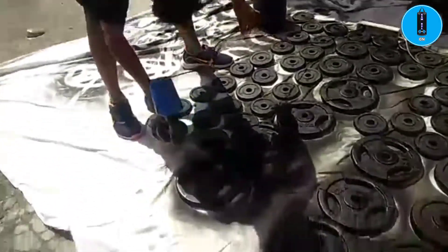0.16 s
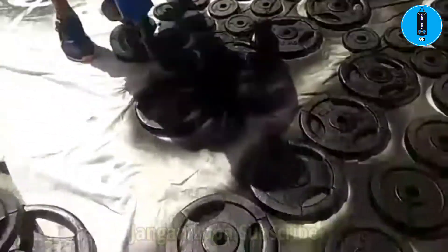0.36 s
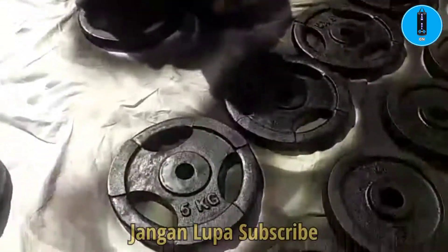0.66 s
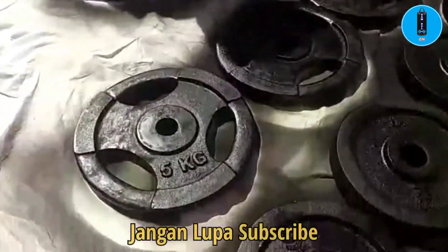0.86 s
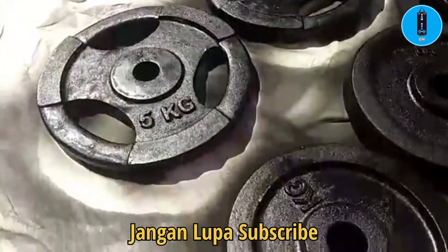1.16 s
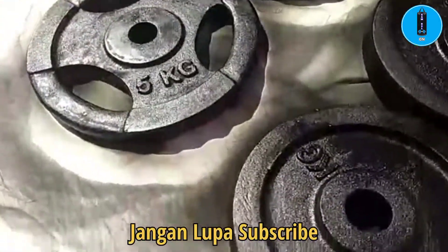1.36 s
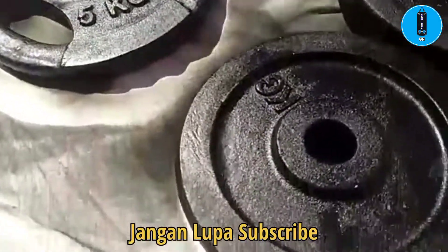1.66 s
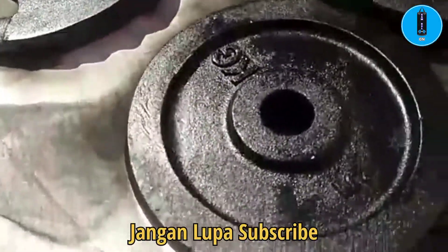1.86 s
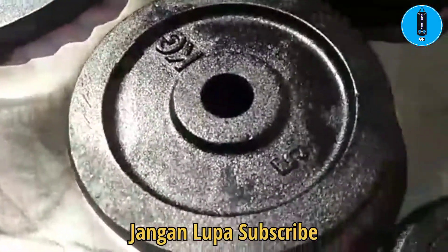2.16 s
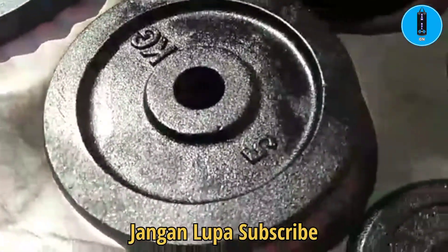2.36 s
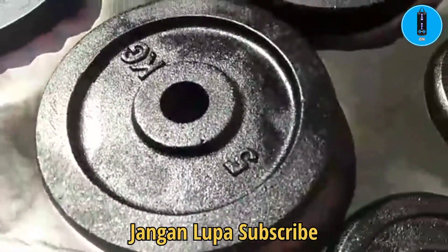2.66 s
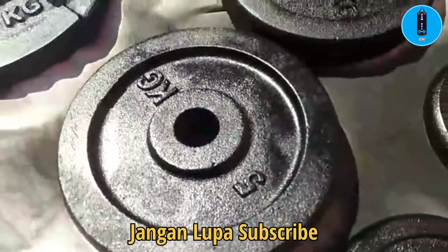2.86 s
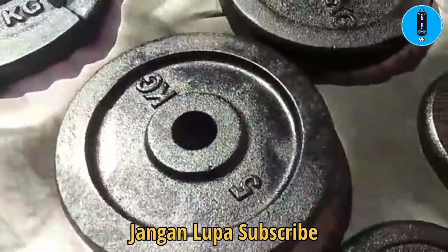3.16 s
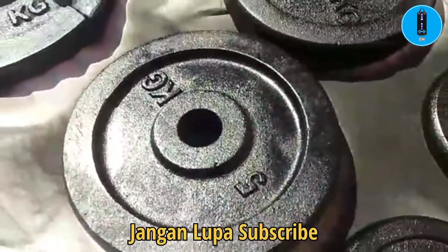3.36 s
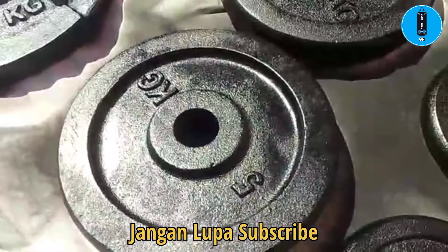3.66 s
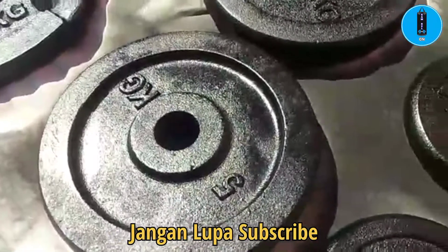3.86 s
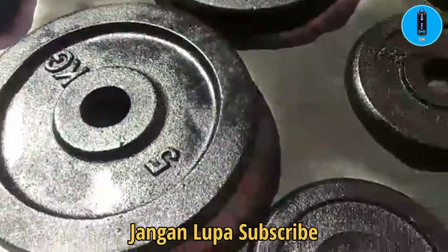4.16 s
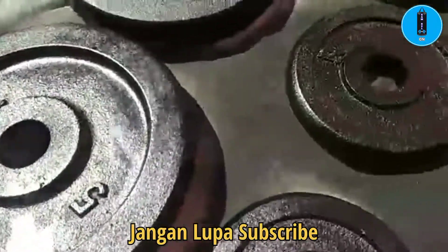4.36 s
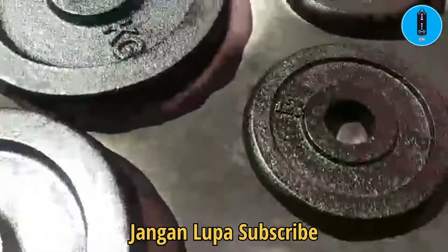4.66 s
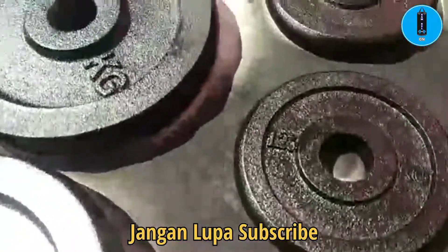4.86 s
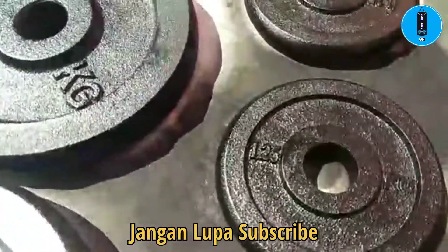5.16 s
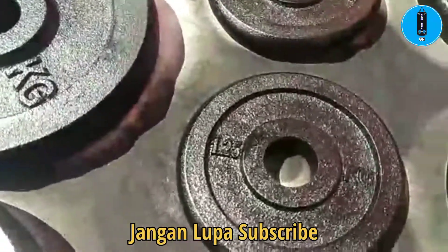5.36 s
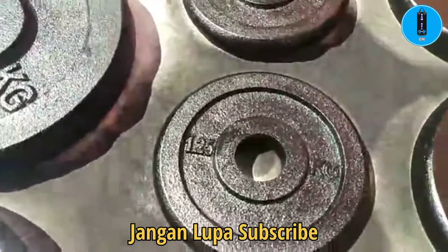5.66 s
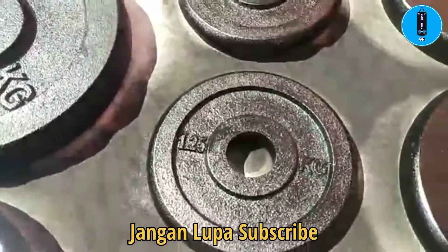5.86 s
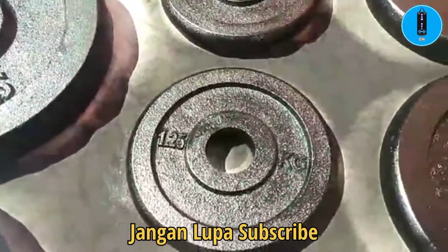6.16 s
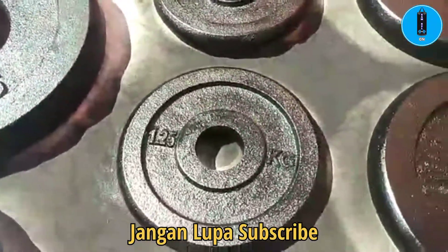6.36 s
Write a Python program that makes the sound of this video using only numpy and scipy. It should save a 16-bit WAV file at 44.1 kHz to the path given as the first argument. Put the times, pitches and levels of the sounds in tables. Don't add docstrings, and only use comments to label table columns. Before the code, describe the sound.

Continuous rushing, ringing motor noise with sharp spray hiss and piercing whine, wide in stereo at first and shifting as the handset moves. Then skin bumps and seals the left microphone, leaving muffled thuds there and the quieter sprayer on the right. A faint far bird whistles briefly; later the hand shifts with a dry scrape and dull knocks. Rough, slightly clipped, grainy handset sound.

```python
import sys
import numpy as np
from scipy import signal
from scipy.fft import rfft, irfft, next_fast_len
from scipy.io import wavfile
from scipy.ndimage import uniform_filter1d

SR = 44100
rng = np.random.default_rng(int(sys.argv[2]) if len(sys.argv) > 2 else 0)


def materialize(psi):
    bounded = np.clip(np.atleast_2d(psi).T, -1, 1)
    quanta = np.round(bounded * 32767).astype(np.int16)
    wavfile.write(sys.argv[1], SR, quanta)


def invert_db(level):
    return 10 ** (np.asarray(level, dtype=float) / 20)


N = 286631


def rms_one(x):
    return x / np.sqrt(np.mean(x ** 2) + 1e-20)


def in_time(rows):
    s, *columns = np.transpose(rows)
    return [np.interp(np.arange(N) / SR, s, c) for c in columns]


def at_hz(points, hz):
    points_hz, points_db = np.array(points)[:, 0], np.array(points)[:, 1]
    return np.interp(np.log(hz), np.log(points_hz), points_db)


def drift(rate):
    r = np.exp(-80 * np.pi * rate / SR)
    white = rng.standard_normal(N // 40 + 2002)
    slow = signal.lfilter([1], [1, -2 * r, r * r], white)[2000:]
    return np.interp(np.arange(N) / 40, np.arange(len(slow)), rms_one(slow))


def passed(x, hz, kind, order=2):
    return signal.sosfilt(signal.butter(order, hz, kind, fs=SR, output="sos"), x)


def ramp(start_s, length_s):
    return np.clip((np.arange(N) / SR - start_s) / length_s, 0, 1)


def bumps(rows, size_of):
    t = np.arange(0, N, 100) / SR
    total = sum(size_of(size) * np.exp(-((t - s) / length) ** 2) for s, length, size in rows)
    return np.interp(np.arange(N) / SR, t, total)


def beam_db(rows, floor_db):
    return 20 * np.log10(invert_db(floor_db) + bumps(rows, invert_db))


# time in seconds, nearness in dB, nozzle aim in dB, casing turn in dB.
GUN = [(0, -3.5, -7.5, 6), (.3, -3.5, -6, 9.5), (.5, -1, -3, 1.5), (.9, .5, -1, 3), (1.5, 0, -1, -0.5),
       (2.0, 1, -2, -0.5), (2.2, 1.5, -1.5, -2), (2.6, -0.5, 0, 2.5), (2.9, 0, -0.5, 3.5),
       (3.5, .5, -0.5, 2), (4.0, -1, -0.5, 3.5), (4.35, 0.5, -0.5, 1.5), (4.5, -0.5, 3, -2),
       (4.65, -1, -0.5, 1), (5.35, -.5, 0, -3), (5.75, -1, -4.5, 0), (6.0, -.5, -2, -4.5),
       (6.5, -1, -1.5, -4.5)]


def gun_position():
    return in_time(GUN)


# time in seconds, share closed from 0 to 1.
SEAL = [
    (2.04, 0.08),
    (2.2, 0.54),
    (2.48, 0.75),
    (2.62, 0.86),
    (3.3, 0.97),
]
OPEN_LAG, SEALED_LAG = 6.8, 18.0


def later(x):
    lag = OPEN_LAG + (SEALED_LAG - OPEN_LAG) * in_time(SEAL)[0]
    return np.interp(np.arange(N) - lag, np.arange(N), x)


COVER_HZ = [670, 1600, 2750, 3400, 4700, 5600, 9000, 13000]
OPEN_DB = [0.5, 3.5, -2, 0, -6, -1.5, -0.5, 3.5]
SEALED_DB = [-30.5, -38.5, -45, -33.5, -35, -29, -28, -36]
FACING_SHARE = [0, 0.072, .14, .17, .25, .3, .6, 0.98]
# time in seconds, gain in dB.
FACING = [(0, 5.5), (.15, 6.5), (.28, 0.5), (.52, 8), (.72, 0.5), (1.0, 2), (1.3, 4.5), (1.88, 6.5),
          (2.02, 3.5)]
# time in seconds, gain in dB.
TREBLE_LEAK = [(2.1, -0.5), (2.3, 6), (2.8, 3.5), (3.4, -5), (4.6, -8), (4.69, 0), (5.1, 0), (5.3, -4),
               (5.6, -2), (5.75, 2), (6.5, -1)]
LEAK_S, LEAK_DB = 4.68, 9


def left_db(hz):
    t = np.arange(0, N, 200) / SR
    open_db, sealed_db, share = (np.interp(np.log(hz), np.log(COVER_HZ), values)
                                 for values in (OPEN_DB, SEALED_DB, FACING_SHARE))
    seal = np.interp(t, *np.transpose(SEAL))
    facing_db = share * np.interp(t, *np.transpose(FACING))
    leak_db = LEAK_DB * (t > LEAK_S) * np.clip(np.log2(hz / 4000) / 1.1, 0, 1)
    gap_db = (t > 2.05) * np.interp(t, *np.transpose(TREBLE_LEAK)) * np.clip(2 * np.log2(hz / 8500), 0, 1)
    shade_db = -30 * max(np.log2(hz / 13500), 0)
    level_db = (1 - seal) * (open_db + facing_db) + seal * sealed_db + leak_db + gap_db
    return np.interp(np.arange(N) / SR, t, level_db) + shade_db


# pitch in Hz, likeness from 0 to 1.
LIKENESS = [(250, 0.55), (700, 0.92), (1700, 0.57), (2500, 0.23), (3500, 0.61), (5200, 0.28), (7500, 0.89),
            (11000, 0.4), (15000, 0.84)]
# pitch in Hz, change in dB.
NEAR_DB = [(300, -5.5), (500, -1), (1000, 0), (2000, 1), (3200, 3), (4200, 1), (6000, 0.5), (8000, 2),
           (10500, -1.5), (13000, 2.5), (15500, 1)]
# centre in seconds, length in seconds, pitch in
# Hz, change in dB.
SWELL_PATCHES = [(0.14, .15, 5600, -6), (.1, 0.091, 640, 10), (0.48, 0.098, 4200, 6), (0.94, 0.24, 1960, 4),
                 (0.83, 0.27, 1060, 4.5), (1.62, 0.13, 5000, 6.5), (1.54, 0.19, 1600, -5.5),
                 (1.74, .15, 14000, -1), (2.02, 0.21, 810, -9), (2.14, 0.1004, 3400, -5.5),
                 (3.2, 0.33, 1900, -2.5), (5.1, 0.67, 1600, 3), (5.2, 0.15, 3500, 3), (5.6, 0.34, 6300, -4),
                 (6.23, 0.28, 9600, 6), (5.15, .1, 9400, 2), (5.6, .9, 2300, -3.5), (6.6, 0.34, 3600, 4),
                 (4.68, 0.036, 4600, -7), (1.1, .15, 14000, -1), (1.62, 0.16, 14000, 1), (1.58, .12, 1200, 3),
                 (.35, 0.16, 9000, 7)]
PATCH_OCTAVES = 0.24


def turbulence(spectrum, ref_hz, per_octave, shared_db, own_db, fast_db, fast_hz):
    size = next_fast_len(N)
    hz = np.maximum(np.arange(size // 2 + 1) * SR / size, 1)
    low_hz, high_hz = spectrum[0][0], spectrum[-1][0]
    right, other = rng.standard_normal((2, N))
    colour = invert_db(at_hz(spectrum, hz)) * (hz > low_hz) * (hz < high_hz)
    in_ref = (hz > ref_hz[0]) & (hz < ref_hz[1])
    colour = colour / np.sqrt(np.sum(colour[in_ref] ** 2) / len(hz))
    near, late, apart = (colour * rfft(v, size) for v in (right, later(right), other))
    out = np.zeros((2, N))
    together = shared_db * drift(10.3)
    both_open = np.clip(1.5 + left_db(670) / 15, 0, 1)
    casing_db = gun_position()[2]
    steps = np.arange(per_octave * np.log2(high_hz / low_hz) + 1)
    for centre in low_hz * 2 ** (steps / per_octave):
        band = np.cos(np.pi / 2 * np.clip(per_octave * np.log2(hz / centre), -1, 1)) ** 2
        alike = np.clip(at_hz(LIKENESS, centre), 0, 1)
        common = late if centre < 6500 else near
        casing_lift_db = .6 * casing_db * np.exp(-(np.log2(centre / 2800) / 0.28) ** 2)
        shape_db = both_open * at_hz(NEAR_DB, centre) + casing_lift_db
        patch_rows = [(s, length, db * np.exp(-(np.log2(centre / at) / PATCH_OCTAVES) ** 2))
                     for s, length, at, db in SWELL_PATCHES]
        flicker_db = together + own_db * drift(2.48) + fast_db * drift(fast_hz)
        flicker = invert_db(shape_db + bumps(patch_rows, float) + flicker_db)
        left_mix = alike * common + np.sqrt(1 - alike ** 2) * apart
        out[0] += flicker * invert_db(left_db(centre)) * irfft(band * left_mix, size)[:N]
        out[1] += flicker * irfft(band * near, size)[:N]
    return out


# pitch in Hz, level in dB per Hz.
ROAR_LOW = [
    (230, -13),
    (335, -21),
    (430, -10.5),
    (600, -13),
    (740, -10),
]
# pitch in Hz, level in dB per Hz.
ROAR = [(440, -42), (750, -8), (815, -20.5), (920, -10.5), (1400, -13), (1850, -10), (2400, -10),
        (2740, -5.5), (3100, -7), (3700, -8), (4370, -6), (4730, -9), (4970, -10), (6180, -12),
        (8000, -22.5), (10400, -14.5), (17600, -120)]


def casing_roar(roar_db):
    spectrum = ROAR_LOW + list(ROAR[1:-1])
    return invert_db(roar_db - 1.5) * turbulence(spectrum, (1000, 4400), per_octave=3, shared_db=0.22,
                                           own_db=1.27, fast_db=1.9, fast_hz=40.5)


def casing_mouth(roar_db):
    centre_hz, width_hz = 2790, 230
    edges = [centre_hz - width_hz / 2, centre_hz + width_hz / 2]
    ring = rms_one(passed(rng.standard_normal((2, N)), edges, "band", order=1))
    turn_db = 1.7 * np.clip(gun_position()[2], -8, 4)
    level = invert_db(roar_db - 10.5 + turn_db + 1.3 * drift(15))
    return level * ring * np.array([invert_db(left_db(centre_hz)), np.ones(N)])


# pitch in Hz, level in dB per Hz.
JET = [
    (6500, -44),
    (7800, -36),
    (8700, -25),
    (9500, -19),
    (10800, -13),
    (12300, -6),
    (13600, -2.5),
    (14900, 0),
    (15900, 0),
]


def nozzle_jet(jet_db):
    return invert_db(jet_db) * turbulence(JET, (10500, 15600), per_octave=12, shared_db=0.1,
                                    own_db=.6, fast_db=1.8, fast_hz=22)


def tone(cycles, level_db, hz):
    wave = np.sqrt(2) * invert_db(level_db) * np.sin(2 * np.pi * cycles)
    return np.array([invert_db(left_db(hz)) * later(wave), wave])


# time in seconds, pitch in Hz.
SHAFT = [
    (0.0, 682),
    (0.07, 667),
    (6.46, 666),
    (6.5, 672),
]
# multiple of the shaft speed, level in dB against the roar.
ORDERS_DB = [
    (2, -27.5),
    (3, -30.5),
    (4, -23),
    (6, -23),
    (21, -14.5),
]
# centre in seconds, length in seconds, change in dB.
FADES = [(0, 0.12, -2), (.55, 0.17, -6), (.8, .13, -7), (.9, 0.033, -5), (.96, .02, 2), (1.02, 0.041, -7),
         (1.09, 0.029, 3.5), (1.17, 0.033, -1), (1.28, 0.11, -3.5), (1.44, .04, -1.5), (1.53, 0.037, -11),
         (1.76, .05, -3), (2.1, 0.05, 5), (2.35, 0.43, 2), (2.61, 0.036, -12), (2.75, 0.091, -3.5),
         (3.23, 0.046, -10), (3.55, 0.18, -2.5), (4.75, 0.21, 3), (5.5, 0.46, 2), (6.1, 0.13, 3)]
# time in seconds, lean in dB.
SWAY = [(.55, 2), (.7, 4), (.85, 4), (1.0, 1.5), (1.2, 5), (1.4, 5), (1.55, 3), (1.7, 2.5), (1.9, 2.5),
        (2.05, 2)]
# centre in seconds, length in seconds, level in dB.
BEAMS = [(0, 0.035, -31), (.2, 0.065, -43.5), (.37, 0.078, -33.5), (.62, 0.063, -36.5), (.88, 0.068, -27),
         (1.15, 0.12, -27), (1.34, 0.091, -26.5), (1.52, 0.11, -28.5), (2.0, 0.11, -31), (2.3, 0.13, -41.5),
         (2.6, 0.12, -45), (3.0, 0.18, -39.5), (3.42, 0.046, -43), (3.68, 0.16, -33.5), (3.87, 0.073, -50),
         (4.13, 0.051, -41), (4.5, 0.084, -40), (4.62, 0.036, -51), (4.9, 0.069, -50), (5.27, 0.1, -43.5),
         (5.54, 0.054, -47), (6.03, 0.04, -44), (6.25, 0.14, -45), (6.49, 0.034, -37)]
# centre in seconds, length in seconds, level in dB.
HIGH_BEAMS = [(.35, 0.29, -40.5), (1.75, .15, -36), (2.75, 0.044, -38), (3.08, .04, -38), (4.0, 0.06, -42),
              (5.22, 0.068, -30), (5.85, 0.04, -29.5), (6.1, 0.075, -35), (6.35, 0.06, -31)]


def whine(gain_db, roar_db):
    blades, shaft_hz = 7, 666
    shaft_db = -22.5 + gain_db + bumps(FADES, float)
    blade_db, second_db = beam_db(BEAMS, -51.5), beam_db(HIGH_BEAMS, -57)
    heard = np.cumsum(in_time(SHAFT)[0] + 0.85 * drift(6.1)) / SR
    turns = np.cumsum(666.2 + .5 * drift(6.7)) / SR
    lean = invert_db(in_time(SWAY)[0] * np.array([[.4], [-.6]]))
    out = tone(heard, shaft_db + 0.92 * drift(16.5), shaft_hz) * lean
    for multiple, level_db in ORDERS_DB:
        out += tone(multiple * turns, roar_db + 3.0 + level_db + 3.3 * drift(3.7), shaft_hz * multiple)
    blade_tones = ((blades, blade_db + 0.73, -1.5),
                   (2 * blades, second_db - 11.5 + 3.0 * drift(15.0), 0.5))
    for multiple, level_db, halo_db in blade_tones:
        hz = shaft_hz * multiple
        halo = invert_db(halo_db) * rms_one(passed(rng.standard_normal(N), 76, "low"))
        out += tone(multiple * turns, level_db + 3.97 * drift(45), hz)
        out += halo * tone(multiple * turns + .25, level_db, hz)
    return out


# time in seconds, rumble in dB, flutter in dB.
DRAUGHT = [(0, -33.5, -31), (.1, -42, -43), (.2, -47.5, -69), (.5, -42, -58), (.9, -39.5, -52),
           (1.3, -36.5, -50), (1.65, -42, -40.5), (1.8, -51.5, -40.5), (2.1, -44, -41), (2.4, -47, -62),
           (3.2, -46.5, -57), (3.45, -52, -54), (4.4, -52.5, -53.5), (4.7, -44.5, -50), (5.05, -50.5, -59),
           (5.6, -51.5, -57), (6.0, -48.5, -52), (6.5, -51.5, -59)]


def draught():
    lumps = passed(rng.standard_normal((3, N)), [85, 140], "band", order=1)
    lumps = lumps / np.sqrt(uniform_filter1d(lumps ** 2, size=5000)) * invert_db(1.8 * drift(14))
    rumble_db, flutter_db = in_time(DRAUGHT)
    rumble = invert_db(rumble_db) * rms_one(passed(lumps[0], 70, "high", order=3))
    left_rumble = invert_db(rumble_db) * rms_one(passed(lumps[1], 70, "high", order=3))
    flutter = rms_one(passed(passed(lumps[2], 160, "high", order=4), 520, "low"))
    right = rumble + invert_db(flutter_db) * flutter
    inside = invert_db(-57.0 + 3.5 * drift(12)) * rms_one(passed(lumps[1], 107, "low")) * (left_db(670) < -10)
    left = invert_db(0.58 * left_db(560)) * (1.04 * right + 0.45 * left_rumble) + inside
    return np.array([left, right])


# time in seconds, peak in dB, pitch in Hz, direction and size of push.
THUMPS = [(2.07, -25, 166.0, -0.98), (2.105, -22, 146, -1), (2.112, -25, 140, -1), (2.139, -24, 130, 1),
          (2.149, -20.5, 121, 1), (2.157, -20, 121, 0.72), (2.165, -32, 110, 1), (2.173, -25.5, 110, 1),
          (2.464, -23, 70, -0.84), (2.615, -25, 110, 1), (2.314, -31, 117, -1.1), (2.372, -28, 106, 0.93),
          (2.422, -36, 236.0, 0.82), (2.459, -6, 85, 0.81), (2.491, -35, 75.0, 1), (2.53, -33, 80, -1),
          (2.91, -37, 90, 0.92), (3.31, -34, 69.5, 1), (2.619, -22, 84, -0.98), (2.67, -30, 68.3, -0.89),
          (2.754, -21.5, 125, -1.14), (2.758, -27, 110, 0.69), (2.854, -33, 86.0, -0.85),
          (2.973, -29, 120.0, 0.89), (3.052, -36, 96.0, 1), (3.157, -30, 123.0, -0.91),
          (3.204, -31, 113.0, -0.98), (3.848, -35, 102.0, 1), (4.567, -37, 156.0, 0.98),
          (4.659, -27, 110, -1), (4.669, -23, 130, 1), (4.674, -14.5, 125, -0.84), (4.684, -16, 140, -1.2),
          (4.696, -17, 100, 0.94), (4.701, -25, 90, -0.86), (4.706, -19, 100, 0.98), (4.713, -24, 70, 1),
          (4.822, -32, 75.0, -0.85), (4.86, -36, 86.0, -1), (4.928, -34, 85, -1.2),
          (5.383, -32, 64.0, -1.2), (5.57, -31, 80.0, 0.83), (5.863, -31, 64.0, -0.75),
          (5.904, -36, 86.0, 1), (6.059, -28, 118.0, -1), (6.11, -32.5, 64.0, -0.91),
          (6.264, -28, 69.0, -0.87)]
# centre in seconds, length in seconds, level in dB, brightness in Hz.
RUBS = [(2.111, 0.053, -37, 200), (2.436, 0.041, -37, 250), (2.616, 0.017, -33, 500),
        (3.149, 0.025, -40.5, 400), (3.848, 0.0081, -36, 300), (4.48, 0.042, -46, 300),
        (4.58, 0.028, -51, 298), (4.683, 0.033, -25, 250), (4.844, 0.022, -41, 90), (4.928, .018, -46, 100),
        (4.758, .025, -45, 150), (3.05, 0.023, -46, 150), (3.2, 0.016, -45, 150), (5.872, .03, -48, 80),
        (4.556, .015, -41, 150), (5.389, 0.03, -41, 120), (5.557, 0.02, -46, 121), (5.963, 0.025, -43, 400),
        (6.041, 0.034, -36.5, 250), (6.35, 0.023, -50, 90)]


def finger():
    thumps, slides, t = np.zeros(N), np.zeros(N), np.arange(N) / SR
    for s, peak_db, hz, way in THUMPS:
        x = (t[:4000] - .02) * hz
        width = np.where(x < 0, .3, .9)
        at = round((s - .02) * SR)
        swing = np.exp(-(x / width) ** 2) * np.cos(2 * np.pi * 1.26 * x / (1 + 0.51 * abs(x)))
        snap = 0.69 * np.exp(-(x / 0.095) ** 2)
        thumps[at:at + 4000] += (way * invert_db(peak_db - 0.5) * (swing + snap))[:N - at]
    for s, length, level_db, bright_hz in RUBS:
        at = round((s - .15) * SR)
        dull = passed(rng.standard_normal(13000), bright_hz, "low", order=1)
        grit = rms_one(passed(dull, 640, "low"))
        swell = np.exp(-((t[:13000] - .15) / length) ** 2)
        slides[at:at + 13000] += (invert_db(level_db) * grit * swell)[:N - at]
    slides, thumps = passed(slides, 41, "high"), passed(thumps, 36, "high")
    through = invert_db(-16.0) * passed(thumps, 140, "high") + invert_db(-4.5) * passed(slides, 300, "high", order=1)
    return np.array([thumps + slides, through])


# centre in seconds, length in seconds, level in dB, start pitch in Hz, end pitch in Hz.
CHIRPS = [
    (2.81, .012, -32, 4380, 4420),
    (2.858, .013, -28.5, 4150, 4380),
    (2.9, .012, -29, 4160, 4220),
    (2.98, .018, -31, 4300, 4240),
    (3.345, .012, -39, 4380, 4330),
    (3.385, .012, -31.5, 4180, 4120),
    (3.42, .012, -35, 4230, 4230),
    (3.507, .008, -30, 4800, 4650),
    (3.495, .026, -34.5, 4170, 4330),
    (3.605, .01, -32, 4900, 4700),
]


def bird():
    out, t = np.zeros(N), np.arange(-3000, 3000) / SR
    air_noise = rng.standard_normal((len(CHIRPS), 6000))
    for (s, length, level_db, start_hz, end_hz), air in zip(CHIRPS, air_noise):
        hz = np.interp(t, [-length, length], [start_hz, end_hz])
        blur = 1 + .6 * rms_one(passed(air, 120, "low"))
        whistle = np.exp(-(t / length) ** 2) * np.sin(2 * np.pi * np.cumsum(hz) / SR)
        at = round(s * SR)
        out[at - 3000:at + 3000] += invert_db(level_db) * blur * whistle
    return np.array([invert_db(left_db(4200)) * later(out), out])


# centre in seconds, length in seconds, level in dB.
SCUFF = (4.682, .022, -27)
# pitch in Hz, width in Hz, level in dB.
SCUFF_PEAKS = [
    (990, 380, -8),
    (1860, 730, 0.5),
    (2720, 580, -4),
    (3300, 400, -6),
]


def scuff():
    s, length, level_db = SCUFF
    white = rng.standard_normal(N)
    rings = sum(invert_db(db) * rms_one(passed(white, [hz - wide / 2, hz + wide / 2], "band"))
                for hz, wide, db in SCUFF_PEAKS)
    grit = rms_one(rings) * invert_db(2.0 * drift(60))
    swell = np.exp(-((np.arange(N) / SR - s) / length) ** 2)
    return invert_db(level_db) * grit * swell * invert_db(np.array([[-19], [0]]))


def scene():
    near_db, aim_db, _ = gun_position()
    gain_db = -8 * ramp(2.035, 0.15)
    roar_db = -24.5 + near_db + gain_db
    jet_db = -17.5 + near_db + aim_db + gain_db
    sprayer = casing_roar(roar_db) + casing_mouth(roar_db) + nozzle_jet(jet_db) + whine(gain_db, roar_db)
    return sprayer + draught() + finger() + bird() + scuff()


# low edge in Hz, high edge in Hz, start in seconds, end in seconds, share of the time lost.
DROPPED = [(280, 430, .11, .36, .8), (290, 370, .38, .52, .7), (300, 450, .57, .72, .7),
           (280, 375, .7, 2.1, .15), (280, 375, 2.8, 3.1, .5), (280, 375, 3.25, 4.5, .55),
           (280, 375, 4.8, 6.5, .35), (750, 850, .8, 3.3, .4), (750, 850, 3.3, 4.6, .75),
           (750, 850, 4.8, 6.5, .6), (1360, 1450, 2.3, 4.1, .25), (2050, 2150, 2.3, 4.3, .15),
           (520, 600, 4.75, 5.0, .6), (4870, 5250, .4, .62, .6), (4900, 5150, .86, .98, .6),
           (4950, 5200, 1.04, 1.26, .5), (4870, 5250, 1.75, 2.15, .4), (7250, 7950, 5.3, 5.5, .6),
           (7250, 7950, 5.85, 6.08, .8), (6750, 7950, 6.1, 6.24, .9), (7100, 8300, 6.36, 6.5, .85)]
# low edge in Hz, high edge in Hz, start in seconds, end in seconds.
OPPOSED = [(3500, 3750, .46, .75), (3250, 3500, .52, .68), (3100, 3300, 1.8, 1.95),
           (3380, 3750, 1.03, 1.08), (3380, 3750, 1.15, 1.22), (3380, 3600, 1.45, 1.49),
           (3500, 3750, 1.49, 1.58), (3400, 3500, .96, 1.05), (3450, 3550, 1.08, 1.15),
           (3330, 3430, 1.2, 1.33), (3200, 3300, .86, .93), (3000, 3100, 1.44, 1.5), (5800, 6250, .48, .51),
           (5550, 5800, .5, .53), (5350, 5550, .53, .55), (4950, 5400, 1.23, 1.25),
           (5350, 5600, 1.25, 1.28), (6100, 6300, .95, 1.02), (5750, 5950, 1.37, 1.4),
           (4350, 4500, 1.96, 2.0), (5650, 5800, 2.01, 2.04), (1750, 1850, 1.3, 1.35),
           (1750, 1850, 1.41, 1.45), (1930, 2030, .06, .1), (2030, 2120, .09, .13), (1750, 1850, .61, .65),
           (1750, 1900, .47, .5)]


def give_up(terms):
    out, frame_s, term_hz = terms.copy(), 1024 / SR, SR / 2048
    luck = uniform_filter1d(rng.standard_normal((len(DROPPED), terms.shape[1])), size=3)
    for (low, high, start, end, share), run in zip(DROPPED, luck):
        when = slice(round(start / frame_s), round(end / frame_s))
        kept = run[when] > np.quantile(run[when], share)
        out[:, when, round(low / term_hz):round(high / term_hz)] *= kept[:, None]
    for low, high, start, end in OPPOSED:
        when = slice(round(start / frame_s + .5), round(end / frame_s) + 1)
        patch = np.s_[:, when, round(low / term_hz):round(high / term_hz)]
        out[patch] -= out[patch].mean(axis=0)
    stray_share, stray_until_s = .035, 2.1
    stray = uniform_filter1d(rng.standard_normal((round(stray_until_s / frame_s), 60)), size=3, axis=0)
    chosen = (stray > np.quantile(stray, 1 - stray_share)).repeat(4, axis=1)
    patch = np.s_[:, :len(stray), 64:304]
    out[patch] -= out[patch].mean(axis=0) * chosen
    return out


def thrift(x, below_db, starved_db, floor_db, grain_db, chance_db):
    n, band = np.arange(2048) + .5, np.arange(46)
    window = signal.windows.kaiser_bessel_derived(2048, 4 * np.pi)[:, None]
    cosines = np.cos(np.pi / 1024 * np.outer(n + 512, n[:736]))
    basis = (window * cosines).astype(np.float32) / np.sqrt(512)
    padded = np.pad(x, ((0, 0), (1280, 2048 - (N + 256) % 1024)))
    blocks = padded.reshape(2, -1, 1024).astype(np.float32)
    terms = np.concatenate([blocks[:, :-1], blocks[:, 1:]], axis=2) @ basis
    kept = n[:736] * SR / 2048 < 15620
    bands = (terms * kept).reshape(2, -1, 46, 16)
    level_db = 10 * np.log10(np.mean(bands ** 2, axis=3) + 1e-14)
    top_db = level_db[:, :, 30:].max(axis=2, keepdims=True)
    busy = top_db.min(axis=0) > top_db.max(axis=0) - 12
    thin_db = (level_db.max(axis=0) + level_db) / 2 + starved_db - np.interp(band, [30, 36], [0, 20])
    masked_db = np.where(busy, thin_db, np.maximum(top_db - below_db, floor_db))
    spared_db = 2.2 * np.maximum(20 - band, 0)
    fine_db = np.interp(band, [2, 4, 14, 20, 28, 34, 42, 45], [25, 3, 0, -4, 0, 6, 6, 0])
    luck = uniform_filter1d(rng.standard_normal(level_db.shape[1:]), size=2, axis=0)
    hidden_step_db = masked_db + chance_db * (.45 + .55 * busy) * luck - spared_db
    grain_step_db = level_db - grain_db + 4 * luck - fine_db
    step = invert_db(np.maximum(hidden_step_db, grain_step_db))[..., None]
    rounded = np.sign(bands) * np.floor(abs(bands) / step + 0.42) * step
    error = np.minimum(rng.standard_normal((len(luck), 23)), 1).repeat(2, axis=1)
    rounded *= invert_db(3.5 * error * (.4 + .6 * busy) * (band > 29))[..., None]
    waves = give_up(rounded.reshape(2, -1, 736)).astype(np.float32) @ basis.T
    joined = waves[:, 1:, :1024] + waves[:, :-1, 1024:]
    return joined.reshape(2, -1)[:, 256:N + 256].astype(float)


def roll_off(x):
    return signal.sosfilt(signal.butter(12, 16840, fs=SR, output="sos"), x)


def record(dry):
    hiss = invert_db(-88) * rng.standard_normal(dry.shape)
    x = 1.368 * np.tanh((dry + hiss) / 1.434)
    x = thrift(x, below_db=12, starved_db=11, floor_db=-41.5, grain_db=4, chance_db=8.0)
    mix = np.clip(x, -.93, .93)
    return roll_off(mix)


dry = scene()
out = record(dry)
materialize(out)
```